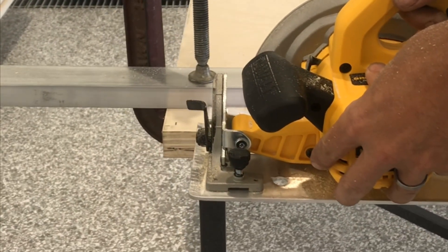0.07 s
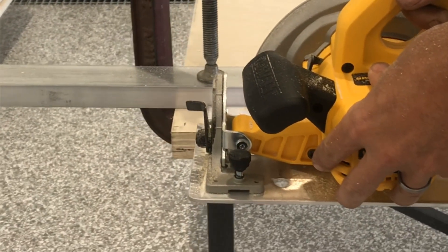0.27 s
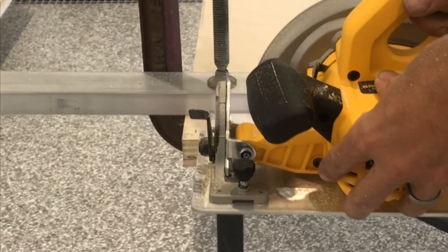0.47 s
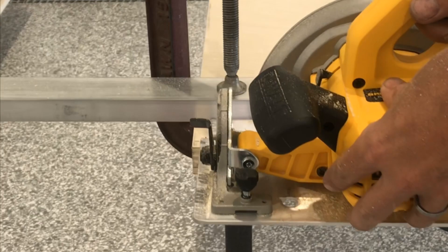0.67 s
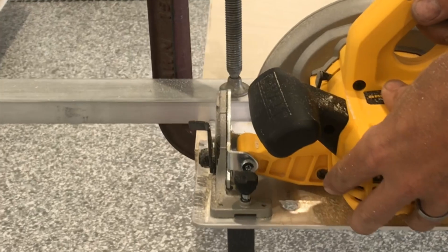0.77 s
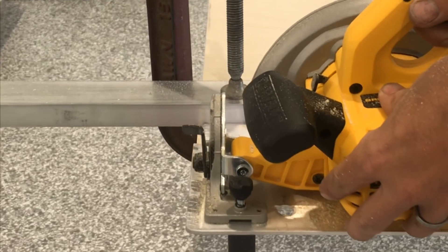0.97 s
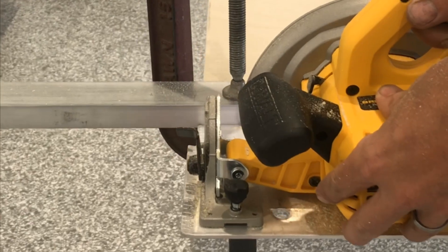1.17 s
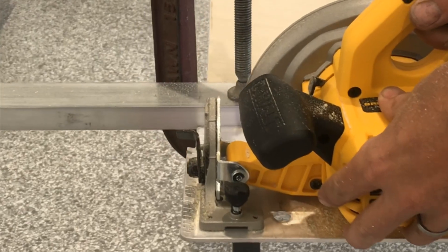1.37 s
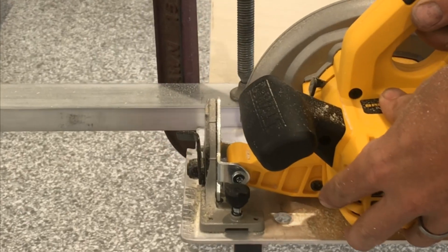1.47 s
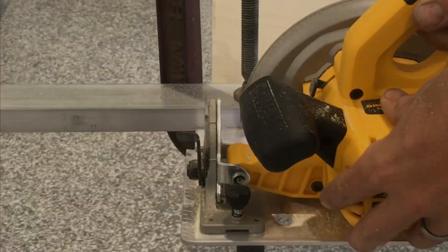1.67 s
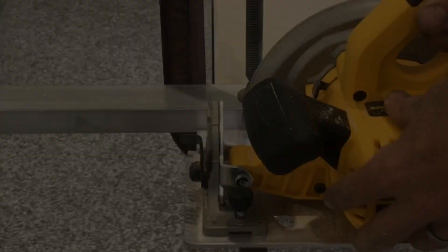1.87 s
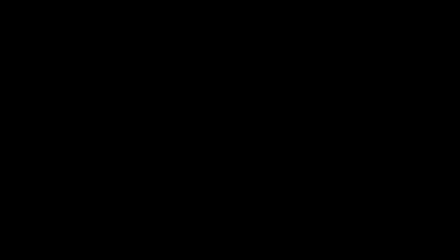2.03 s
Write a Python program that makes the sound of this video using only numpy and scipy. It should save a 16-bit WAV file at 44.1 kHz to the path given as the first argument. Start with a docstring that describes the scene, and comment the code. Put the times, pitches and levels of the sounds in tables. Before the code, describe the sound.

A circular saw cuts through plywood close up, rasping and whining, then fades out.

```python
"""In a workshop, a circular saw cuts plywood along a guide, heard close up and in mono.
The teeth rasp and whine in step with the blade, and the steel disc rings under their blows.
The motor hums and the board drones. The blade hisses and squeals as it rubs in the slot it cuts.
As the blade leaves the wood the load drops and the motor speeds up; then the sound is faded out."""
import sys
import numpy as np
from scipy.fft import rfft, irfft, next_fast_len
from scipy.io import wavfile
from scipy.ndimage import map_coordinates

SR = 44100
rng = np.random.default_rng(int(sys.argv[2]) if len(sys.argv) > 2 else 0)


def waveform_to_disk(signal):
    """Save audio, clipped to [-1, 1], as 16-bit WAV at the path in sys.argv[1]."""
    frames = np.transpose(np.atleast_2d(signal))
    scaled = np.clip(frames, -1, 1) * 32767
    samples = np.round(scaled).astype(np.int16)
    wavfile.write(sys.argv[1], SR, samples)


N = 94197
TOP_HZ = 15750  # the highest sound kept

# The tone colour of the rasp. Each row: frequency in Hz, relative level in dB.
RASP_COLOUR = [(25, -50), (100, -23), (300, -10.5), (450, -18.5), (650, -11.5), (900, -6), (1250, -1),
               (1800, -3), (2200, -1), (2800, 3), (3400, -1.5), (4600, 2.5), (5600, .5), (6800, 0.6),
               (8500, -1.5), (10000, -1.5), (12300, -.5), (13600, -3.5), (15200, -6), (17000, -12)]


def amp(db):
    """Turn decibels into a gain."""
    return 10 ** (np.asarray(db) / 20)


def unit(x):
    """Scale a signal to an average (rms) level of 1."""
    return x / np.sqrt(np.mean(x ** 2) + 1e-20)


def seconds():
    """The time of each sample."""
    return np.arange(N) / SR


def curve(rows):
    """Join (time, value) points with straight lines."""
    return np.interp(seconds(), *np.transpose(rows))


def wobble(rate):
    """A smooth random curve through `rate` points a second."""
    return map_coordinates(rng.standard_normal(size=1024), [seconds() * rate + 2], mode="wrap")


def filtered(x, response):
    """Scale each frequency in x by response(hz)."""
    size = next_fast_len(N + SR // 2)
    return irfft(rfft(x, size) * response(np.fft.rfftfreq(size, 1 / SR)), size)[:N]


def coloured(x, colour):
    """Shape x with (Hz, dB) points, then set its level to 1."""
    points_hz, db = np.transpose(colour)
    return unit(filtered(x, lambda hz: amp(np.interp(np.log(hz + 1), np.log(points_hz + 1), db))))


def noise(colour):
    """Noise with the given tone colour."""
    return coloured(rng.standard_normal(N), colour)


def ring(hz, width_hz):
    """Noise that rings around one pitch, at level 1."""
    return unit(filtered(rng.standard_normal(N), lambda f: 1 / (1 + 2j * (f - hz) / width_hz) ** 2))


def tone(cycles, flicker_db, drift, rate):
    """A tone at level 1 that wavers in loudness and, by `drift` radians, in phase."""
    flicker = amp(flicker_db * wobble(rate))
    phase = 2 * np.pi * (cycles + rng.random()) + drift * wobble(rate)
    return unit(flicker * np.sin(phase))


def jagged_buzz(cycles, renew_hz, size=4096):
    """A jagged wave that repeats every cycle and slowly changes with the wood."""
    spectra = np.exp(2j * np.pi * rng.random((64, size // 2 + 1)))
    below_top = np.arange(size // 2 + 1) < TOP_HZ * N / SR / cycles[-1]
    shapes = irfft(spectra * below_top, size)
    age = seconds() * renew_hz + rng.random()
    wave = map_coordinates(shapes, [age, cycles % 1 * size], order=1, mode="grid-wrap")
    blend_level = np.hypot(age % 1, 1 - age % 1)  # blending two shapes dips the level
    return coloured(wave / blend_level, RASP_COLOUR)


def rasp(turns):
    """Fibres tear and the teeth buzz above them, pulsing with each turn and quarter turn."""
    quarters = 4 * turns
    buzz = amp(-6.5) * jagged_buzz(turns, renew_hz=9.23)
    buzz += amp(-5.5) * jagged_buzz(quarters, renew_hz=16)
    treble = lambda hz: 1 - 1 / (1 + (hz / 1710) ** 4)
    fibres = filtered(noise(RASP_COLOUR), lambda hz: amp(-3 * treble(hz)))
    pulse_db = 0.27 * np.sin(2 * np.pi * turns) + 0.35 * np.sin(2 * np.pi * quarters)
    grain_db = 0.6 * wobble(60)
    return amp(pulse_db + grain_db) * (fibres + filtered(buzz, treble))


def tooth_whine(turns):
    """The 24 teeth whine, and the four-part blade adds overtones."""
    # Each row: multiple of the blade speed, level in dB relative to the bite.
    overtones = [(24, -20.5), (26, -20.5), (36, -23), (40, -21.5), (44, -23.5), (48, -20.5), (52, -20.5),
                 (60, -34), (68, -25), (100, -40), (104, -38), (128, -58), (132, -18.5), (136, -22),
                 (144, -27)]
    return sum(amp(db) * tone(k * turns, flicker_db=1.5, drift=0.77, rate=26) for k, db in overtones)


def disc_ring(bite):
    """The steel rings under the random blows of the cut, more freely as the wood lets go."""
    # Each row: pitch in Hz, width in Hz, level in dB relative to the drive.
    resonances = [(1766, 108, -17.5), (2833, 110, -17.5), (4350, 300, -21), (5020, 31, -16.5),
                  (6150, 48, -21), (11750, 95, -18), (12640, 190, -18), (14580, 160, -15)]
    drive = bite.max() * (bite / bite.max()) ** 0.83  # falls more slowly than the bite
    return drive * sum(amp(db) * ring(hz, width) for hz, width, db in resonances)


def chatter(turns, depth_db=1.5):
    """A pulsing gain: the blade runs slightly crooked and presses on the wood once a turn."""
    return unit(amp(depth_db * (np.sin(2 * np.pi * turns) + 0.4 * wobble(70))))


def motor(turns, bite):
    """The shaft hums, a high whine follows the load, and the fan blows air."""
    # The shaft's hum. Each row: time in seconds, level in dB.
    hum_levels = [(0, -43), (.8, -43.5), (1, -49), (1.3, -48.5), (1.45, -45), (1.65, -47.5), (1.9, -44),
                  (2.1, -48)]
    # The fan's air. Each row: frequency in Hz, relative level in dB.
    air_colour = [(100, -12), (500, -22.5), (1000, -3.5), (1600, 4.5), (3000, 3), (5000, 5.5), (9000, 0.5),
                  (16000, 3.5)]
    shaft_turns = 4.78 * turns  # gear ratio
    hum = amp(curve(hum_levels)) * tone(shaft_turns, flicker_db=1.7, drift=0.04, rate=30)
    whine = amp(-15.5) * bite * tone(13 * shaft_turns, flicker_db=3.6, drift=0.56, rate=30)
    return hum + whine + amp(-32.5) * noise(air_colour)


def swell(start, end, ramp_s):
    """A gain that rises and falls between two times, never above 1."""
    t = seconds()
    return np.clip(np.minimum(t - start, end - t) / ramp_s, 0, 1)


def board(turns, bite):
    """The board and its stand rumble, drone, and throb in step with the blade."""
    # Each row: time in seconds, level in dB.
    rumble_levels = [(0, -46), (.22, -44), (.3, -40), (.42, -45), (.62, -43), (.74, -43), (.85, -43),
                     (1.0, -47.5), (1.18, -47), (1.33, -46.5), (1.55, -53.5), (1.76, -55), (1.87, -54),
                     (2.02, -67)]
    # Each row: frequency in Hz, relative level in dB.
    rumble_colour = [(15, -70), (36, -51), (54, -3), (74, -1), (95, -8), (125, -4.5), (200, -9), (280, -8),
                     (450, -17), (1500, -44)]
    # Each row: start in seconds, end in seconds, pitch in Hz, level in dB.
    drone_notes = [(-.05, 0.365, 237, -46), (0.334, .72, 130, -39.5), (0.828, 1.386, 149, -49.5),
                   (1.652, 1.94, 180, -55)]
    # Each row: multiple of the blade speed, level in dB relative to the bite.
    throb_tones = [(2, -33), (4, -41.5), (7, -39.5), (8, -30.5), (9, -36.5), (11, -38.5), (13, -30.5)]
    drones = np.zeros(N)
    for start, end, hz, db in drone_notes:
        note = tone(hz * seconds(), flicker_db=1.2, drift=0.2, rate=15)
        drones += amp(db) * swell(start, end, ramp_s=0.1) * note
    throb = sum(amp(db) * tone(k * turns, flicker_db=3, drift=0.48, rate=13.95) for k, db in throb_tones)
    rumble = amp(curve(rumble_levels)) * noise(rumble_colour)
    return rumble + drones + bite * throb


def rubbing(turns):
    """The blade rubs in its slot: it hisses, and single overtones squeal for a moment."""
    # Each row: start in seconds, end in seconds, multiple of the blade speed, level in dB.
    squeal_notes = [(.03, 0.447, 100, -32), (0.193, 0.496, 52, -31), (.3, .48, 44, -32),
                    (0.417, 0.568, 128, -30), (0.415, 0.564, 132, -25), (0.464, 0.758, 136, -31),
                    (.18, 0.345, 24, -29.5), (.87, 1.318, 24, -30.5), (0.875, 1.252, 60, -40),
                    (0.974, 1.2, 132, -31), (0.976, 1.236, 156, -25.5), (1.354, 1.484, 48, -27.5),
                    (1.36, 1.612, 16, -35.5), (1.36, 1.585, 40, -31), (1.37, 1.564, 44, -34.5),
                    (1.375, 1.598, 52, -39), (1.47, 1.556, 108, -27), (1.478, 1.553, 116, -24.5),
                    (1.45, 1.62, 88, -32), (1.407, 1.642, 36, -32.5), (1.658, 1.815, 36, -34.5),
                    (1.848, 2.068, 36, -38), (1.78, 2.12, 16, -49)]
    # Each row: time in seconds, level in dB.
    hiss_levels = [(0, -30), (.25, -23), (.43, -25.5), (.47, -24.5), (.6, -26), (.85, -27), (1.1, -27),
                   (1.3, -34), (1.6, -50), (2.1, -63)]
    squeals = np.zeros(N)
    for start, end, k, db in squeal_notes:
        roughness = 1 / (1 + (27 / k) ** 4)  # low squeals are smooth, high ones rough
        note = tone(k * turns, flicker_db=3 * roughness, drift=0.45 * roughness, rate=110)
        squeals += amp(db) * swell(start, end, ramp_s=0.042) * note
    hiss = amp(curve(hiss_levels) + 1.2 * wobble(63)) * ring(hz=9900, width_hz=1660)
    return squeals + hiss


def scene():
    """Add up the saw's sounds, tied together by the blade's speed and bite."""
    # Each row: time in seconds, turns per second.
    blade_speeds = [(0.0, 75), (0.08, 73.44), (0.16, 73.62), (0.3, 73.42), (0.42, 73.63), (0.5, 73.5),
                    (0.62, 73.64), (0.7, 73.75), (0.8, 73.27), (0.9, 74.15), (1.02, 74.76), (1.12, 74.98),
                    (1.26, 74.77), (1.4, 75.6), (1.56, 76.08), (1.72, 77.07), (1.86, 77.7), (2.1, 78.86)]
    # How hard the teeth bite. Each row: time in seconds, level in dB.
    bite_levels = [(0, -17.5), (.07, -17), (.22, -18), (.9, -17), (1.12, -17), (1.27, -17.5), (1.36, -20),
                   (1.44, -19.5), (1.53, -20.5), (1.63, -23), (1.7, -24.5), (1.84, -27.5), (1.92, -33),
                   (2.1, -34.5)]
    turns = np.cumsum(curve(blade_speeds)) / SR  # blade turns so far
    bite = amp(curve(bite_levels))
    steel = chatter(turns) * disc_ring(bite) + chatter(turns) * rubbing(turns)
    cutting = bite * (rasp(turns) + tooth_whine(turns))
    saw = cutting + steel + motor(turns, bite) + board(turns, bite)
    return np.array([saw, saw])


def record(dry):
    """Fade down, cut to silence before the fade ends, and remove the highest treble."""
    fade_start_s, fade_end_s, stop_s = 1.963, 2.151, 2.108
    t = seconds()
    fade = np.clip((fade_end_s - t) / (fade_end_s - fade_start_s), 0, 1) * (t < stop_s)
    return np.array([filtered(side * fade, lambda hz: hz < TOP_HZ) for side in dry])


dry = scene()
out = record(dry)
waveform_to_disk(out)
```